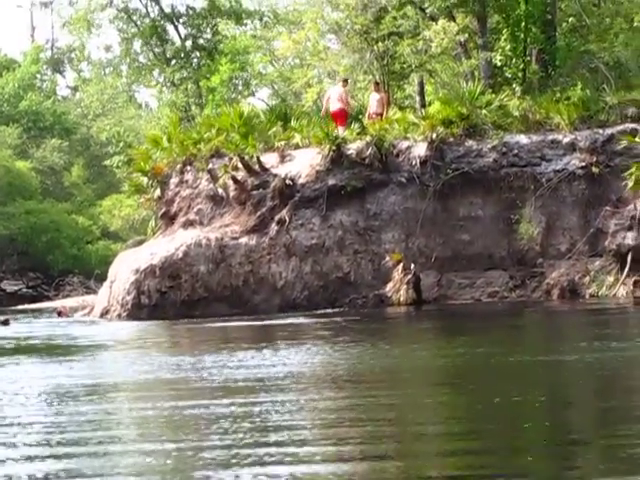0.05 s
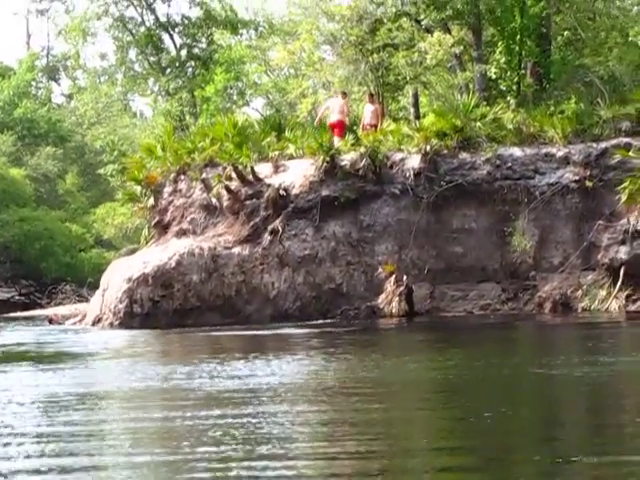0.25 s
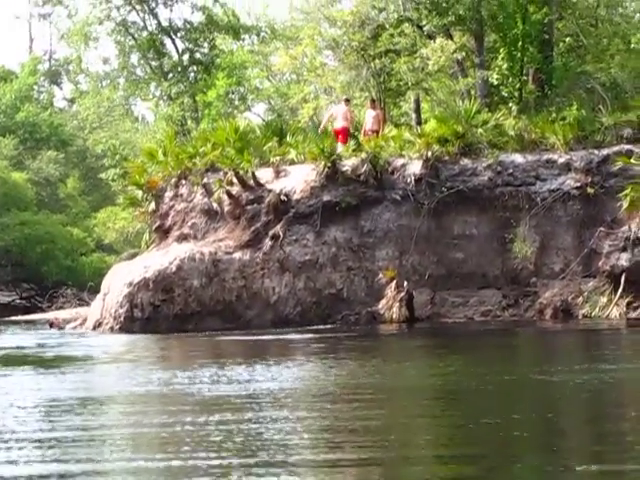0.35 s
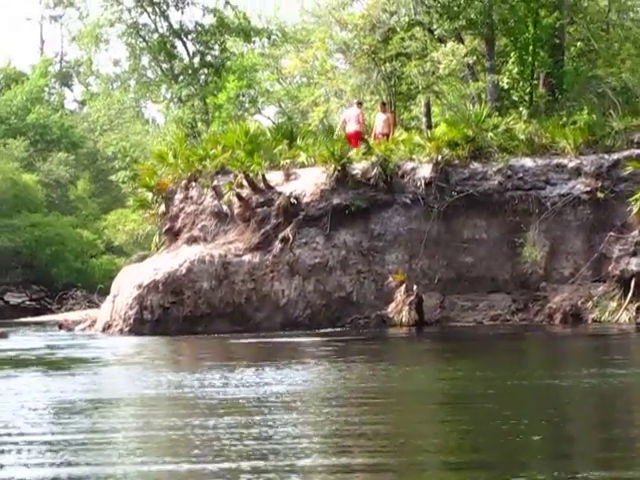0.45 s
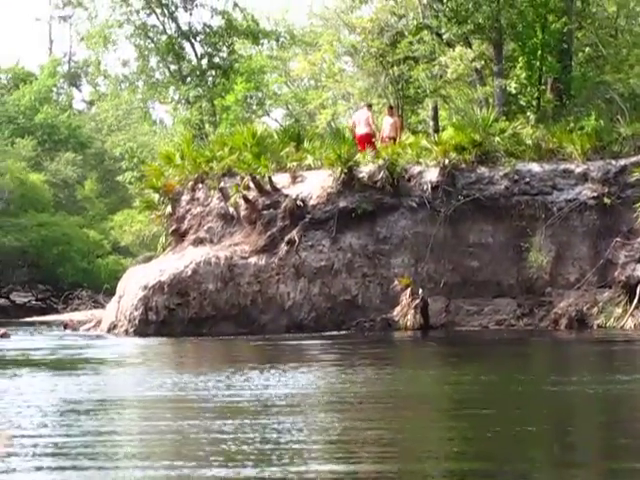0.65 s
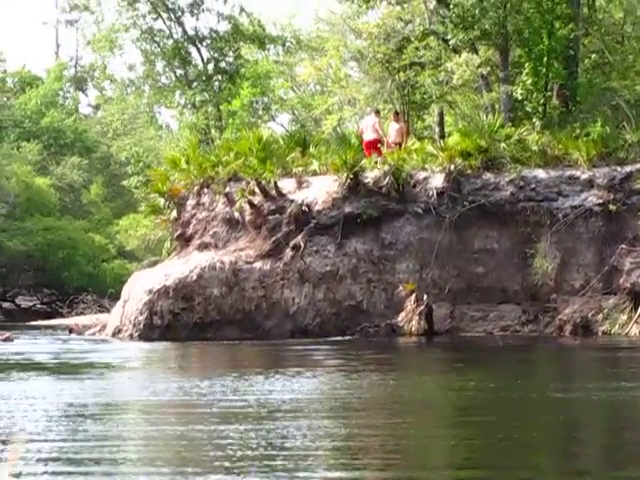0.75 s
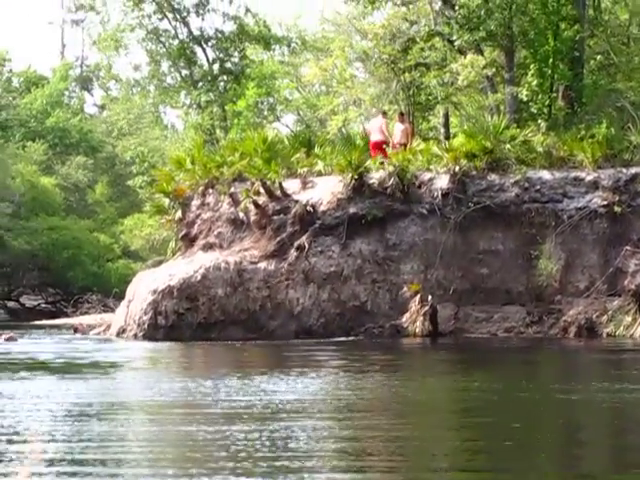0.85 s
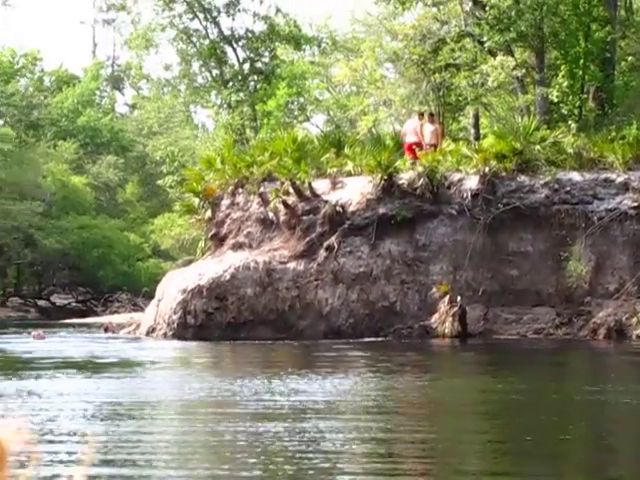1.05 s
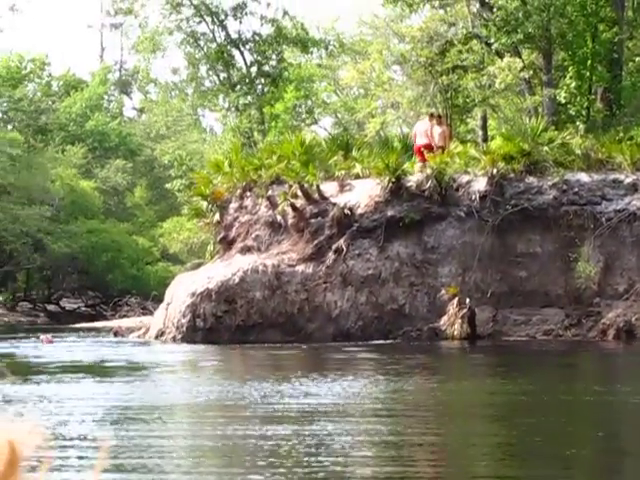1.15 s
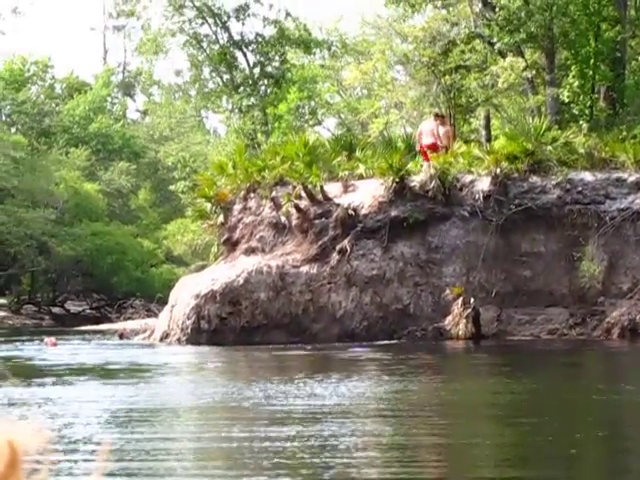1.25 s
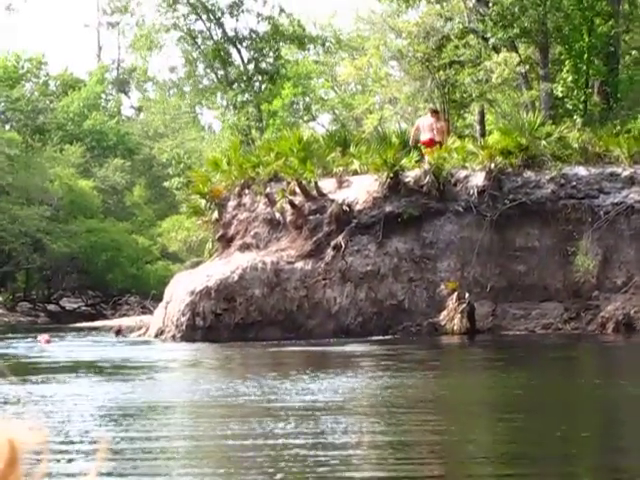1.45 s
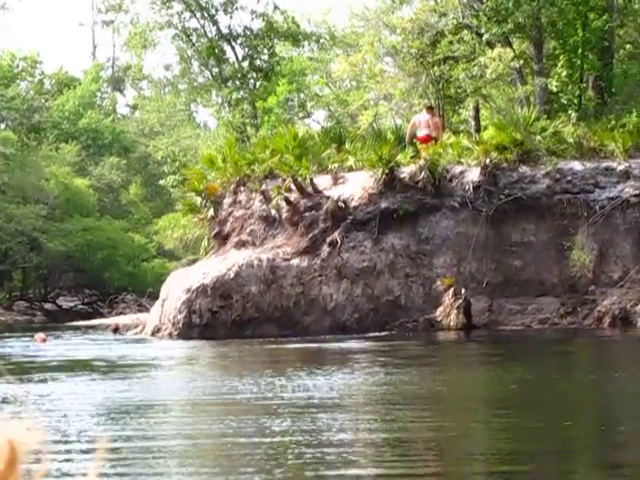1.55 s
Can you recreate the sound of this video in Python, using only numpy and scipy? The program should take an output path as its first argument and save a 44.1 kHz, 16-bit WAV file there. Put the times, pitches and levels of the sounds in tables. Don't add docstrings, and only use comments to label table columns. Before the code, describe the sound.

Close to a small stereo microphone, a paddle strikes a hollow plastic hull, bright then duller with a splashy slap; a faint tap, drips and a soft swish follow over quiet river hiss.

```python
import sys
import numpy as np
from scipy import signal
from scipy.fft import rfft, irfft, next_fast_len
from scipy.io import wavfile

SR = 44100
rng = np.random.default_rng(int(sys.argv[2]) if len(sys.argv) > 2 else 0)


def output_pcm(signal):
    pcm = np.clip(np.atleast_2d(signal).T, -1, 1) * 32767
    wavfile.write(sys.argv[1], SR, np.round(pcm).astype(np.int16))


def invert_db(level):
    return 10 ** (np.asarray(level, dtype=float) / 20)


N = 70560


def seconds():
    return np.arange(N) / SR


def at_hz(points, hz):
    known_hz, values = np.array(points).T
    return np.interp(np.log(hz), np.log(known_hz + 1e-9), values)


def at_time(points):
    return np.interp(seconds(), *np.transpose(points))


def rms_one(x):
    return x / np.sqrt(np.mean(x ** 2) + 1e-20)


def drift(rate_hz):
    r = np.exp(-2 * np.pi * rate_hz / SR)
    settle = 20000
    white = rng.standard_normal(N + settle)
    return rms_one(signal.lfilter([1], [1, -2 * r, r * r], white)[settle:])


def ring(clicks, hz, t60_s):
    r, w = invert_db(-60 / (t60_s * SR)), 2 * np.pi * hz / SR
    return signal.lfilter([0, np.sin(w)], [1, -2 * r * np.cos(w), r * r], clicks + 1e-18)


def butter(x, hz, kind, order=2):
    sos = signal.butter(order, np.clip(hz, 10, .45 * SR), kind, fs=SR, output="sos")
    return signal.sosfilt(sos, x)


def ports(x, lag_ms):
    left_db = -1.9
    shadow_hz, shadow_db, shadow_octaves = 6500, -10, .5
    size = next_fast_len(N + 512)
    hz = np.arange(size // 2 + 1) * SR / size + 1
    octaves_off = np.log2(hz / shadow_hz) / shadow_octaves
    shadow = invert_db(shadow_db * np.exp(-.5 * octaves_off ** 2))
    delay = np.exp(-2j * np.pi * hz * lag_ms / 1000)
    far = irfft(rfft(x, size) * shadow * delay, size)[:N]
    return np.array([invert_db(left_db / 2) * x, invert_db(-left_db / 2) * far])


# start in seconds, level in dB, contact cut-off in Hz, slow low modes in dB.
KNOCK_EVENTS = [
    (0.206, -10, 2450, 1.5),
    (0.214, -49, 1300, 5),
    (0.3804, -15, 574, -2.5),
    (.3970, -25, 564, -1),
    (0.5728, -26, 1420, 0),
]
# frequency in Hz, level in dB, t60 in seconds.
HULL_MODES = [(102.1, -15, 0.11), (128.2, -23.5, 0.3), (156.2, -12, 0.095), (255, -14.5, 0.14),
              (309, -11, 0.17), (441.7, -7, 0.085), (513, 7.5, 0.024), (574, -13.5, 0.092),
              (697.5, -13, 0.093), (890, -6.5, 0.057), (1050, 0.5, 0.021), (1333, 8.5, 0.0066),
              (1650, -4.5, 0.022), (2180, -9, 0.019)]


def hull_modes(start_s, low_db, wobble):
    travel_s, swell_s, dispersion, sag = .010, .020, 1.9, .09
    body = 0
    for k, (hz, level_db, t60_s) in enumerate(HULL_MODES):
        slow = (100 / hz) ** dispersion
        age = np.clip(seconds() - start_s - travel_s * slow, 0, 2 * t60_s)
        unsteady = 1 + (wobble[k] - 1) * np.clip(age / .03, 0, 1)
        phase = 2 * np.pi * hz * age * (1 + sag * (.5 - age / t60_s))
        sign = np.sign(hz - 700) if hz > 400 else (-1) ** k
        decay = invert_db(level_db + low_db * min(1, 1.06 * slow) - 60 * age / t60_s)
        swell = 1 - np.exp(-age / (swell_s * slow))
        body = body + sign * decay * swell * unsteady * np.sin(phase)
    return body


def hull():
    thud_db, thud_hz, thud_rise_s, thud_t60_s = -11.5, (106, 486), 0.013, 0.19
    shell_db, shell_t60_s, shell_hz = -7.5, 0.043, 1300
    hollow_db, hollow_t60_s = -9, .18
    wobble_db, lag_ms = 6, 0.071
    out, t = np.zeros(N), seconds()
    rustle = rms_one(butter(rng.standard_normal(N), [260, 4000], "band"))
    rumble = rms_one(butter(rng.standard_normal(N), thud_hz, "band"))
    wobble = [invert_db(wobble_db * drift(25)) for _ in HULL_MODES]
    for start_s, db, cut_hz, low_db in KNOCK_EVENTS:
        since = np.maximum(t - start_s, 0)
        thud_rise = 1 - np.exp(-(since / thud_rise_s) ** 2)
        thud = invert_db(thud_db + low_db - 60 * since / thud_t60_s) * thud_rise * rumble
        body = hull_modes(start_s, low_db, wobble) + thud
        decay = invert_db(-60 * since / shell_t60_s) + invert_db(hollow_db - 60 * since / hollow_t60_s)
        shell = decay * invert_db(shell_db) * (t > start_s) * rustle
        shell = butter(shell, shell_hz, "low", order=1)
        shell = butter(shell, 2 * cut_hz, "low", order=1)
        out += invert_db(db) * (butter(body, cut_hz, "low") + shell)
    return ports(butter(out, 72, "high", order=3), lag_ms)


def slap():
    start_s, level_db, t60_s, band_hz = .396, -22.5, 0.1, (1500, 6500)
    age = seconds() - start_s
    spray = rms_one(butter(rng.standard_normal(N), band_hz, "band"))
    return invert_db(level_db - 60 * np.abs(age) / t60_s + 2.8 * drift(190)) * (age > 0) * spray


# start in seconds, level in dB, pitch in
# Hz, t60 in seconds, glide in octaves per second.
BUBBLE_EVENTS = [(0.3973, -1.5, 1207, 0.012, 39.5), (0.3994, -3, 1443, 0.012, 12),
                 (.3803, -25, 2200, .012, -5), (0.2045, -35.5, 2970, 0.069, -2),
                 (.4025, -17, 2650, 0.034, -7), (.422, -33, 1500, 0.013, -20), (0.423, -28, 2600, 0.024, 0),
                 (0.439, -42, 2600, .03, 14), (0.6068, -43, 1240, 0.029, 4), (0.633, -32, 1180, 0.011, 8),
                 (0.3954, -11.5, 2185, 0.016, -13), (0.399, -3, 3080, 0.0076, -5),
                 (0.4042, -23.5, 1050, 0.049, 4), (0.4149, -7, 1860, 0.0051, -14),
                 (.4235, -23, 885, 0.058, -20.5), (.467, -29.5, 620, 0.027, 41),
                 (0.473, -31.5, 1500, 0.026, 10), (.498, -34.5, 1570, 0.048, -9.5),
                 (0.497, -23.5, 2200, 0.0069, 6), (.538, -30.5, 2020, 0.011, 21),
                 (0.608, -31.5, 1800, 0.0089, 7), (0.6345, -23.5, 1970, 0.0053, 9),
                 (.6487, -28, 2110, 0.018, 12), (0.665, -39, 1680, 0.051, 2), (.672, -20, 3550, 0.013, 14),
                 (0.411, -20, 4130, 0.013, 11), (0.6901, -26, 1480, 0.01, 18), (.687, -30.5, 990, 0.019, -3),
                 (.709, -39.5, 650, 0.026, 18), (0.729, -32, 1800, 0.013, 6),
                 (0.733, -38.5, 960, 0.068, 8.5), (0.741, -30.5, 820, 0.076, 17),
                 (0.779, -40, 952, 0.15, 15), (0.805, -26.5, 1730, 0.016, 12),
                  (.813, -24, 1660, 0.007, 23), (0.979, -36, 1800, 0.019, 2), (.990, -28, 2500, 0.0095, -6),
                  (1.01, -25.5, 2900, 0.0092, -3), (1.0465, -35, 829, 0.092, -2),
                  (1.076, -33, 753, 0.099, 1.5), (1.137, -33.5, 1440, 0.072, -3.5),
                  (1.150, -18, 1300, 0.0078, 11), (1.151, -21.5, 2290, 0.045, 1.5),
                  (1.179, -21.5, 2846, 0.038, -12), (1.203, -21.5, 2186, 0.043, -14.5),
                  (1.219, -27, 1050, 0.026, -14), (1.331, -34, 1380, 0.026, 2), (1.196, -17, 2400, .02, 15),
                  (1.209, -19, 2720, .015, -3), (1.18, -29, 1710, .025, 1), (1.232, -24, 1850, .02, 5),
                  (1.243, -26, 2040, 0.023, 10), (1.183, -35, 722, .04, 12), (1.289, -39, 1410, 0.031, 7),
                  (.87, -39.5, 800, 0.034, 6), (0.929, -45.5, 340, 0.1, -3), (1.005, -37, 1450, 0.017, 7)]


def bubbles():
    rise_cycles = 0.57
    out, t = 0, seconds()
    for start_s, db, hz, t60_s, glide in BUBBLE_EVENTS:
        age = np.clip(t - start_s, 0, 2 * t60_s)
        phase = 2 * np.pi * hz * age * (1 + .5 * np.log(2) * glide * age)
        swell = 1 - np.exp(-age * hz / rise_cycles)
        out = out + invert_db(db + 3.5 - 60 * age / t60_s) * swell * np.sin(phase)
    return out


# start in seconds, peak in dB, ring in Hz.
DROP_EVENTS = [(0.0968, -20, 5560), (0.2466, -18, 8000), (.3789, -16, 13300), (0.3953, -5, 6500),
               (0.3952, -3.5, 12160), (0.4338, -15, 11400), (0.4418, -12, 5260), (0.453, -15.5, 7200),
               (0.47, -30, 12200), (0.629, -23, 4660), (0.6423, -21, 4800), (0.664, -16, 5400),
               (0.6715, -19.5, 12200), (0.6875, -21.5, 12900), (0.704, -24, 11700), (0.734, -18, 4900),
               (0.7652, -7, 10950), (0.7679, -19.5, 4860), (0.8011, -21, 12300), (0.866, -24, 5100),
               (0.9189, -23, 5000), (0.9762, -22.5, 7600), (0.9835, -29, 11800), (1.017, -24.5, 5100),
               (1.0839, -23, 4430), (1.139, -17, 5000), (1.145, -33, 4770), (1.2036, -11, 6500),
               (0.152, -29, 9450), (0.2244, -21.5, 6500), (.3018, -39, 13100), (.4928, -31, 11200),
               (.5457, -32.5, 11000), (0.594, -36, 6900), (0.6243, -24.5, 7100), (.7017, -35, 5900),
               (0.714, -33, 12500), (.7417, -36, 11500), (.7472, -37, 14200), (0.793, -27, 9000),
               (0.8236, -33, 10600), (0.904, -31.5, 10700), (.9065, -28, 6600), (0.9415, -46, 12800),
               (1.0625, -36, 10400), (1.0705, -42, 12500), (1.1482, -26.5, 9500), (1.158, -12, 7800),
               (1.2036, -27, 11700), (1.2335, -33, 12500), (1.2516, -32, 11000), (1.311, -33.5, 12300),
               (1.537, -32, 9100)]
# ring in Hz, spit in dB.
DROP_SPIT = [(4500, -10), (12000, -3.5)]


def drops():
    half_width_octaves, top_hz = .5, 12500
    rise_s, spit_s, ring_db, ring_cycles = 0.00024, .0005, -6, 25
    out, t = np.zeros(N), seconds()
    white = rng.standard_normal(N)
    spread = 2 ** half_width_octaves
    for start_s, db, hz in DROP_EVENTS:
        age = np.maximum(t - start_s - .0006, 0)
        rise = 1 - np.exp(-age / rise_s)
        noise = rms_one(butter(white, [hz / spread, hz * spread], "band", order=1))
        spit = invert_db(at_hz(DROP_SPIT, hz)) * noise * np.exp(-age / spit_s)
        tone = invert_db(ring_db - 60 * age * hz / ring_cycles) * np.sin(2 * np.pi * hz * age)
        out += invert_db(db) * rise * (spit + tone)
    return butter(out, top_hz, "low")


# time in seconds, level in dB.
WATER_FLOW = [(0.388, -69), (0.405, -30), (0.429, -33.5), (.5, -49), (0.599, -62), (0.679, -41.5),
              (.82, -46), (.92, -55), (1.1, -41), (1.152, -32), (1.208, -31.5), (1.297, -42), (1.359, -52),
              (1.6, -103)]
# frequency in Hz, level in dB per Hz.
SWISH_SPECTRUM = [(150, -40), (500, -21.5), (900, -4), (2200, -4), (3300, -1.5), (4000, -15.5),
                  (8000, -23.5), (15500, -43)]
# frequency in Hz, share of the flow's swing.
FLOW_SHARE = [(300, 0.27), (1200, 1), (10000, 1)]


def swish():
    grains_per_s, grain_cycles, grain_spread_db, spray_db = 2600, 22, 2.6, -6
    full_db = -36
    flow_db = at_time(WATER_FLOW)
    sizes = invert_db(grain_spread_db * np.minimum(rng.exponential(1, N), 4)) * rng.choice([-1, 1], N)
    born = rng.random(N) < grains_per_s * invert_db(.3 * (flow_db + 40) + 3 * drift(30)) / SR
    grains = rms_one(sizes * born)
    pitches_hz = np.geomspace(300, 15000, 34)
    dealt = rng.integers(0, 34, N)
    hiss = rng.standard_normal(N)
    rings = []
    for k, hz in enumerate(pitches_hz):
        feed = (grains + invert_db(spray_db) * np.sqrt(hz / 1000) * hiss) * (dealt == k)
        rung = butter(ring(feed, hz, grain_cycles / hz), [.78 * hz, 1.28 * hz], "band")
        rings.append(invert_db(at_hz(SWISH_SPECTRUM, hz)) * hz * rung)
    full = invert_db(full_db) / np.sqrt(np.mean(sum(rings) ** 2))
    moving = 0
    for hz, rung in zip(pitches_hz, rings):
        moving = moving + invert_db(at_hz(FLOW_SHARE, hz) * (flow_db - full_db)) * rung
    return full * moving


def crackle():
    drips_per_s, band_hz, level_db = 390, (4030, 9000), -60
    stirred = np.clip((at_time(WATER_FLOW) + 62) / 14, 0, 1)
    born = rng.random(N) < drips_per_s * stirred * invert_db(5 * drift(15)) / SR
    drips = born * invert_db(7.4 * np.minimum(rng.exponential(1, N), 3))
    dealt = rng.integers(0, 9, N)
    pitches_hz = np.geomspace(*band_hz, num=9)
    rings = sum(ring(drips * (dealt == k), hz, 20 / hz) for k, hz in enumerate(pitches_hz))
    return invert_db(level_db) * rms_one(rings)


# time in seconds, level in dB.
GURGLE_LEVEL = [
    (.5, -56),
    (.85, -58),
    (1.03, -47.5),
    (1.1, -53),
    (1.3, -61),
]


def gurgle():
    bubbles_per_s, band_hz = 400, (264, 620)
    born = rng.random(N) < bubbles_per_s / SR
    clicks = born * invert_db(2 * np.minimum(rng.exponential(1, N), 3)) * rng.choice([-1, 1], N)
    dealt = rng.integers(0, 10, N)
    pitches_hz = np.geomspace(*band_hz, num=10)
    rings = sum(ring(clicks * (dealt == k), hz, 14 / hz) for k, hz in enumerate(pitches_hz))
    return invert_db(at_time(GURGLE_LEVEL)) * rms_one(butter(rings, band_hz, "band"))


def cockpit_echo(x):
    level_db, t60_s = -22, .07
    t = np.arange(int(.25 * SR)) / SR
    tail = rng.standard_normal((2, len(t))) * invert_db(-60 * t / t60_s) * (t > .004)
    tail = tail / np.sqrt(np.sum(tail ** 2) / 2)
    return invert_db(level_db) * signal.fftconvolve(x, tail, axes=1)[:, :N]


# frequency in Hz, band level in dB.
RIVER_SPECTRUM = [(15, -56), (25, -42), (102, -4.5), (437, -12.5), (486, -2), (604, -2), (812, -6),
                  (6500, -17.5), (9400, -27.5), (16000, -37.5)]
# frequency in Hz, left-right likeness.
RIVER_LIKENESS = [(60, 0.82), (380, 0.92), (2380, 0.49), (15000, -2.6)]


def river():
    level_db, flicker_db = -48, 2.22
    out, edges_hz = 0, 25 * 2 ** np.arange(0, 9.6, .5)
    white = rng.standard_normal((2, 2, N))
    for k, (low, high) in enumerate(zip(edges_hz, edges_hz[1:])):
        mid, side = butter(white[k % 2], [low, high], "band")
        hz = np.sqrt(low * high)
        alike = np.clip(at_hz(RIVER_LIKENESS, hz), 0, 1)
        stereo = np.sqrt(1 + alike) * mid + np.sqrt(1 - alike) * side * [[1], [-1]]
        out = out + invert_db(at_hz(RIVER_SPECTRUM, hz) + flicker_db * drift(12.4)) * stereo
    return invert_db(level_db) * rms_one(out)


def insects():
    centre_hz, width_hz, level_db = 7980, 940, -61
    band_hz = [centre_hz - width_hz / 2, centre_hz + width_hz / 2]
    mid, side = butter(rng.standard_normal((2, N)), band_hz, "band")
    return invert_db(level_db + 0.21 * drift(8.2)) * rms_one(mid + .5 * side * [[1], [-1]])


def scene():
    water_lag_ms, drop_lag_ms = .155, 0.1818
    swish_left_db = -3
    water = ports(bubbles() + gurgle() + slap(), water_lag_ms) + ports(drops() + crackle(), drop_lag_ms)
    stroke_pan = invert_db(np.array([[.5], [-.5]]) * swish_left_db)
    water = water + ports(swish(), water_lag_ms) * stroke_pan
    return hull() + water + cockpit_echo(water) + river() + insects()


def low_pass(x):
    return signal.sosfilt(signal.butter(12, 16990, fs=SR, output="sos"), x)


def record(dry):
    duck_from_db, duck_share, release_db_per_s, attack_s = -25, 0.11, 123, 0.0086
    ramp_db = release_db_per_s * seconds()
    peak_db = 20 * np.log10(np.abs(dry).max(axis=0) + 1e-9)
    held_db = np.maximum.accumulate(peak_db + ramp_db) - ramp_db
    r = np.exp(-1 / (attack_s * SR))
    over_db = signal.lfilter([1 - r], [1, -r], np.maximum(held_db - duck_from_db, 0))
    ducked = dry * invert_db(-duck_share * over_db)
    top_cut = signal.cheby2(14, 45, 16350, fs=SR, output="sos")
    return low_pass(signal.sosfilt(top_cut, ducked))


dry = scene()
out = record(dry)
output_pcm(out)
```